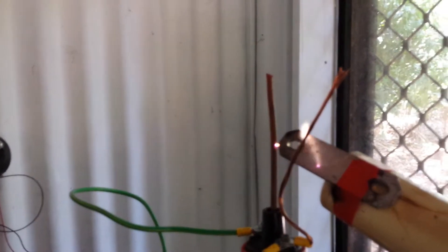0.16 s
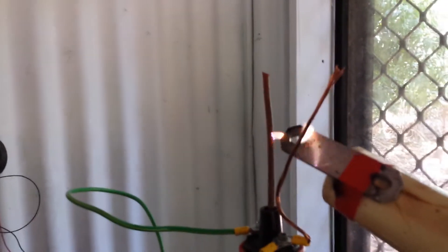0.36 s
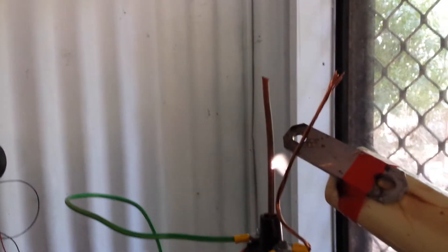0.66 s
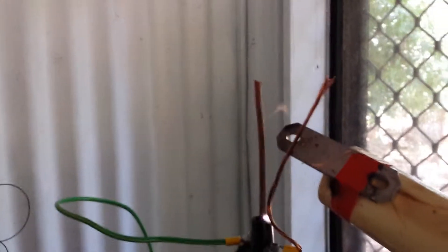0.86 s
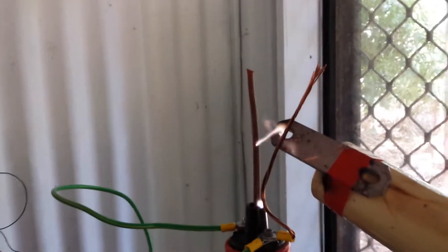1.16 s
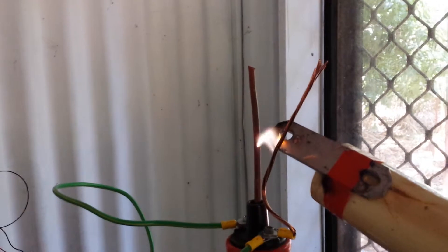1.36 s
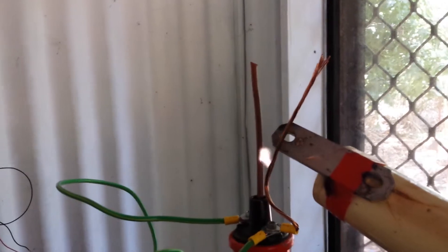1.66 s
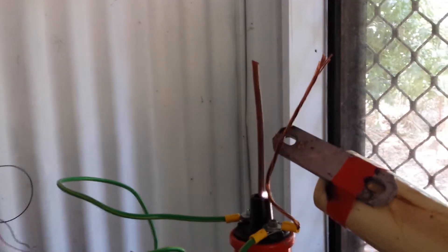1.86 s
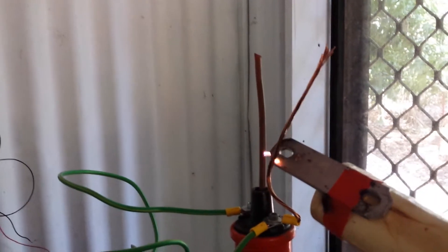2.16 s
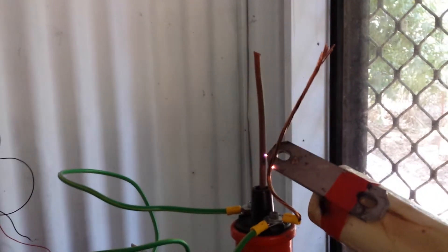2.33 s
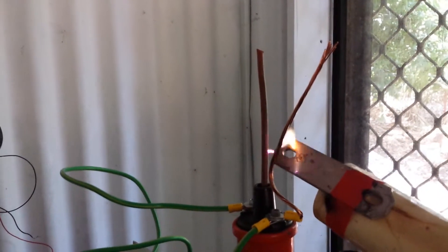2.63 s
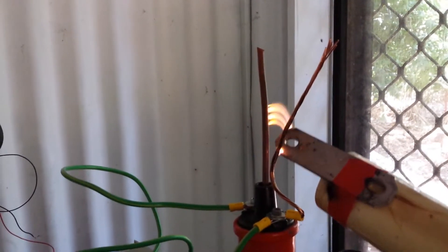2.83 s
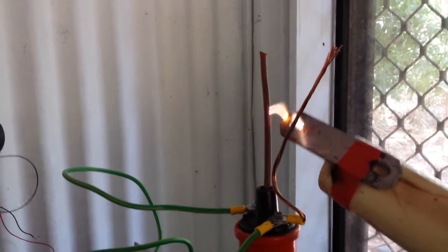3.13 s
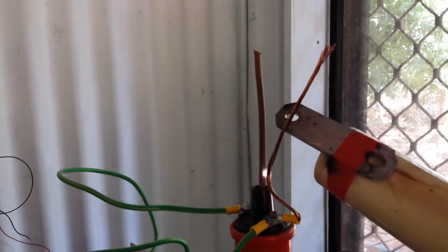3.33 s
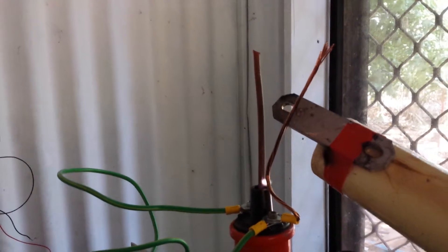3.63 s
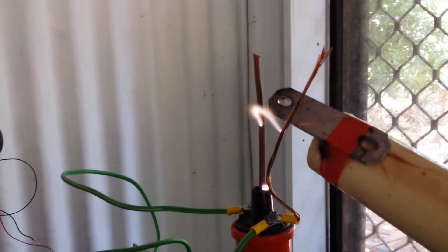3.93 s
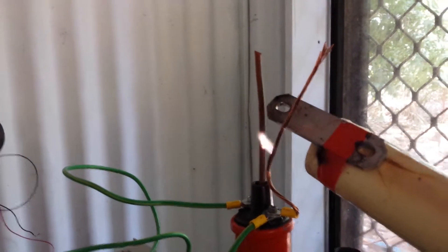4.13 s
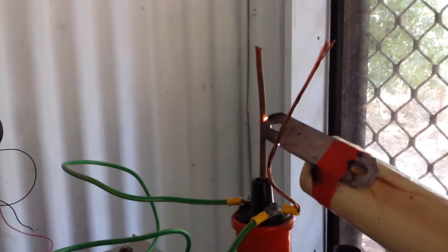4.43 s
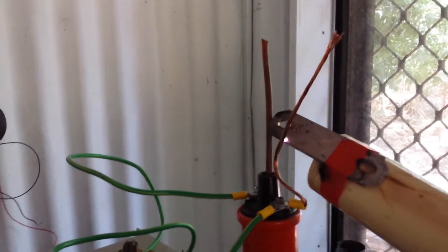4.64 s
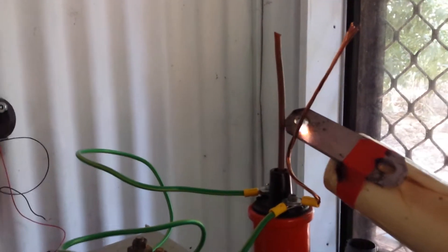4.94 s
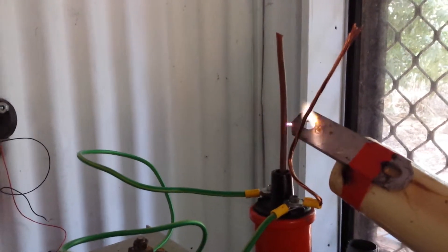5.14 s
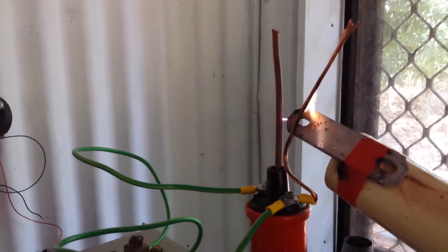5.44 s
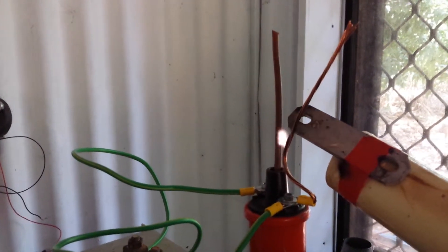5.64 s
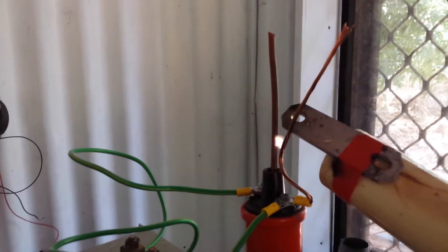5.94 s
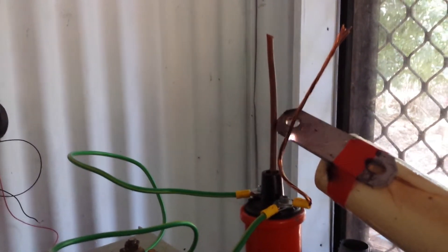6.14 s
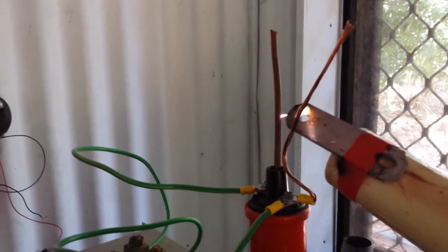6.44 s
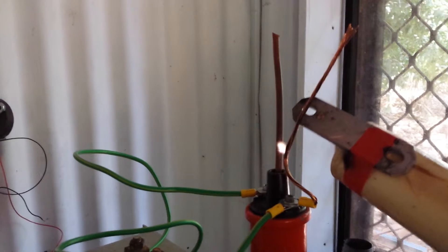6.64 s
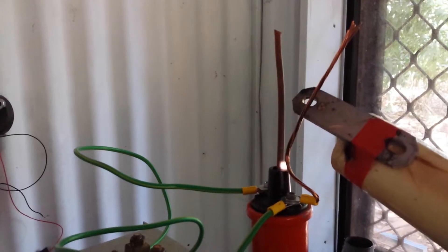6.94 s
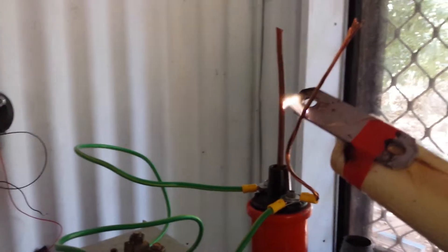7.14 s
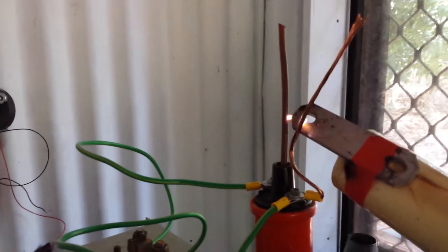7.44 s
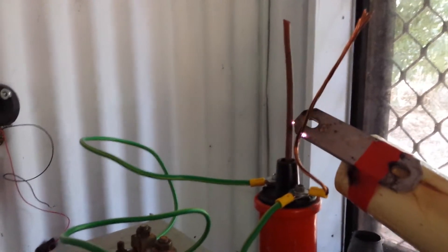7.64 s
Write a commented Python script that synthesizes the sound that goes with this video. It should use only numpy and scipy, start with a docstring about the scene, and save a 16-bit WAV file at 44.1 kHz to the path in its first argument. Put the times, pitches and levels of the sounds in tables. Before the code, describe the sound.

Close up in a small shed, an electric arc crackles continuously with a bright sizzle, dense high hiss and a thin, piercing whine. It surges irregularly several times a second, rasping and snapping as it stretches, breaks and strikes again. From about one second on, spells of fast, crisp spark ticking come and go, along with brief high squeals. A soft drone like a fan stays in the background.

```python
"""Inside a metal shed, close to the microphone, a high-voltage arc burns between wires on an ignition coil.
From the start it buzzes and fries, breaking down on every half cycle of the mains, while the coil whines
at its switching rate. Again and again a steel blade draws it out: it strikes later, the whine sags deeper
with the supply ripple, and the arc rasps, breaks and relights. From about one second on it falls back at
times to the narrow gap and ticks cleanly, most often near the end. A fan-like drone lies behind it all."""
import sys
import numpy as np
from scipy import signal
from scipy.fft import rfft, irfft, next_fast_len
from scipy.io import wavfile
from scipy.ndimage import uniform_filter1d

SR = 44100
rng = np.random.default_rng(int(sys.argv[2]) if len(sys.argv) > 2 else 0)


def unload_wav(signal):
    """Save mono or channel-first audio to the path in sys.argv[1] as 16-bit WAV at rate SR, clipped to [-1, 1]."""
    wavfile.write(
        sys.argv[1],
        SR,
        np.round(np.clip(np.atleast_2d(signal).T, -1, 1) * 32767).astype(np.int16),
    )


N = 343539
TIME = np.arange(N) / SR

# Levels in the tables are relative; the mix sets the final balance.
# Supply ripple. Each row: time in seconds, half cycles per second.
RIPPLE_RATE = [(0, 99.5), (1, 99.49), (2, 99.6), (3, 99.74), (4, 99.82), (5.3, 99.9), (7, 99.97),
               (7.8, 99.99)]
# The blade draws the arc out. Each row: break in seconds, time for the last 10 dB of growth in ms, peaks
# of whine, hiss, strikes, sizzle and plume in dB, rasp pitch in Hz, rasp level in dB.
BLADE_PULLS = [(0.17, 60, -27, -33.5, -24, -32, -31, 4270, -26),
               (0.294, 120, -9, -23, -35, -19, -26, 3840, -33),
               (0.518, 70, -14.5, -36, -22, -25, -33, 4080, -29),
               (0.619, 90, -11, -23.5, -21.5, -19, -35, 4160, -34),
               (0.943, 69.6, -16, -39.0, -53, -30, -48, 4100, -47),
               (1.38, 58.6, -32, -37.5, -38, -36, -52, 2490, -44),
               (1.438, 60, -14, -25.5, -22.5, -25, -51, 2150, -29),
               (1.658, 100, -10, -29, -23.5, -23.5, -31.5, 4190, -37),
               (1.806, 100, -14, -29.5, -22.5, -26, -37, 2570, -31),
               (1.995, 160, -9, -23.0, -25, -21.5, -26.5, 3140, -38),
               (2.346, 100, -14, -27.5, -29, -22, -26.5, 2960, -32),
               (2.723, 110, -15, -26, -25, -24, -27.5, 3780, -41),
               (2.975, 90, -24, -35.5, -26.5, -24, -37, 4200, -29),
               (3.178, 140, -9, -25.5, -25, -38, -32, 2880, -28.5),
               (3.825, 70, -8.5, -26, -22.5, -27, -35.5, 3930, -31),
               (3.999, 120, -14, -26, -26.5, -20, -33, 3050, -28),
               (4.132, 60, -10, -28.5, -26, -21.5, -34, 3040, -35),
               (4.291, 80, -11, -24.5, -26, -28, -53, 2886, -28.5),
               (4.533, 63, -18, -36.5, -30.5, -23, -49, 3010, -39),
               (4.615, 60, -9, -25.5, -29.5, -24, -50, 2985, -32),
               (4.954, 200, -21, -31.5, -28.5, -28, -49, 3900, -39),
               (5.096, 51, -9.5, -28, -25.5, -21, -45, 4200, -36),
               (5.335, 150, -9, -23.5, -26, -23, -29, 2640, -43),
               (5.617, 81, -24, -29, -23.5, -23, -27, 3110, -29),
               (5.739, 110, -12, -27, -24.5, -20.5, -35, 3130, -26),
               (5.972, 110, -13.5, -35.5, -27.5, -22.5, -30.5, 2656, -32.5),
               (6.061, 100, -17, -26.5, -23.5, -20, -51, 2677, -26),
               (6.262, 59.3, -32, -35.5, -39, -19.5, -42, 3400, -38),
               (6.616, 50, -24, -35.5, -26, -22.5, -56, 2250, -36),
               (6.766, 66, -9.5, -27.5, -24.5, -28, -56, 2830, -30),
               (6.912, 72, -9, -26, -25.5, -44, -34, 3040, -43),
               (6.996, 130, -12, -26, -28, -20.5, -32, 2810, -23),
               (7.136, 60, -31, -34, -42, -27, -36, 2596, -49),
               (7.751, 70, -34, -34, -30, -33, -42, 2040, -48)]
# The arc between pulls. Each row: time in seconds, then whine, hiss, strikes, sizzle and plume in dB.
SHORT_ARC_LEVELS = [(0.0, -16, -36.0, -33, -22.5, -38.5), (0.4, -14.5, -37.5, -33.5, -36, -37.5),
                    (0.772, -14.5, -38.5, -30, -24.5, -38.5), (1.049, -14.5, -35, -40.5, -26.5, -36),
                    (1.206, -23, -40, -44, -27.5, -47), (1.323, -15.5, -37, -39, -25, -41.5),
                    (2.126, -15, -40.5, -32, -27.5, -37.5), (2.854, -15, -37, -35, -25.5, -40),
                    (3.063, -15, -33, -27, -32, -32.5), (3.33, -20.5, -38, -48, -26.5, -49.5),
                    (3.553, -15, -35.5, -45, -26, -43), (4.59, -16.5, -45.5, -40, -29.5, -38),
                    (5.216, -14, -46, -39, -27, -39.5), (6.252, -14.5, -36.5, -35, -31, -39.5),
                    (6.506, -18, -38.5, -52, -27, -44), (7.198, -14.5, -32.5, -30, -25.5, -35),
                    (7.434, -18, -39, -47, -29.5, -43), (7.788, -14.5, -33.5, -34, -24, -38)]
# Parts of the arc. Each row: name, growth power (1 even in dB, 2 rounded), collapse in dB per second.
ARC_PARTS = [("whine", 1.7, 400), ("hiss", 1.1, 210), ("strikes", 2.7, 180), ("sizzle", 1.3, 97),
             ("plume", 0.8, 280)]
# The short arc nearly goes out. Each row: centre in seconds, half length in seconds, depth in dB.
ARC_LULLS = [(3.39, 0.0507, 1.5), (3.89, 0.0515, 3), (4.444, 0.053, 4), (4.738, 0.13, 3), (5.47, 0.057, 4),
             (5.889, 0.095, 4.5)]
# Hard restrikes. Each row: start in seconds, crack level in dB, frying level in dB.
RESTRIKES = [(0.1416, -7.0, -35), (0.302, -3, -19), (0.6361, -9, -27), (1.3168, -10, -22),
             (1.357, -12, -26), (1.3777, -3, -28), (1.4073, 0, -27), (1.4278, -11, -37),
             (1.4484, -5.0, -32), (1.4592, -5.5, -26), (1.5685, -3, -30), (1.6496, -4, -22),
             (1.7802, 0, -25), (1.8092, -4, -18.5), (2.0025, -7, -22), (2.2614, -6, -34), (2.2915, -3, -35),
             (2.3219, 1, -25), (2.3538, -6, -32), (2.7352, -13, -20.5), (3.1144, -2, -22),
             (3.1748, -5, -22), (3.6548, -13, -36), (3.7149, -10, -28), (3.7553, -3, -31),
             (3.7855, -1, -32), (3.8573, -17, -19.5), (3.8956, -9, -21), (3.9458, -2.5, -34),
             (3.9558, -2, -36), (3.9955, -7, -25), (4.0155, -9, -19.5), (4.0458, -4, -32), (4.106, -6, -33),
             (4.1357, -3, -25), (4.1576, -6, -28), (4.2061, -4.5, -33), (4.308, -7.0, -25),
             (4.9071, -7, -33), (4.9179, -7, -23), (5.1289, -14, -33), (5.2376, -3.5, -32),
             (5.3473, -4.0, -18), (5.7076, -6, -20.5), (5.7503, -8, -28), (5.9382, -5, -31),
             (6.049, -4, -22), (6.07, -11, -28), (6.2683, -7, -31), (6.3778, -8, -32), (6.6285, -8, -33),
             (6.7783, -3.0, -21), (6.7883, -6, -32), (6.869, -1, -33), (7.0205, -7, -22), (7.0789, -3, -29),
             (7.0889, -2, -32), (7.1188, -6, -25), (7.1788, -4, -33), (7.1888, -5.5, -35),
             (7.2288, -3, -33), (7.3584, -15, -27), (7.7584, -8, -35)]
# Ticking at the narrow gap. Each row: start in seconds, end in seconds, level in dB.
NARROW_GAP_RUNS = [(0.98, 1.384, -33.5), (2.365, 2.444, -35), (2.801, 2.89, -49), (3.33, 3.459, -33),
                   (3.458, 3.763, -29.5), (3.942, 4.15, -39), (4.888, 5.19, -31), (6.248, 6.31, -37),
                   (6.418, 6.648, -33.5), (6.696, 6.874, -31), (7.065, 7.783, -31.5)]
# Spectra of the discharges and the background rush. Each row: frequency in Hz, level in dB.
SPARK_SPECTRUM = [(100, -70), (250, -25), (520, -21.5), (800, -9), (1010, -13), (1150, -10.5), (1450, -4.5),
                  (2200, 5), (3000, -2), (4200, 2), (6500, 1), (8500, -3.5), (11500, -28.5)]
SPUTTER_SPECTRUM = [(100, -33), (170, -24), (300, 8), (420, 0.5), (520, -1.5), (700, 3), (880, 5.5),
                    (1010, -13), (1100, 5.5), (1500, 7), (2400, 11.5), (5000, 7), (9000, -2.5),
                    (13000, -20)]
SIZZLE_SPECTRUM = [(1500, -34), (3500, -1.5), (4900, 1), (5500, 6.5), (6500, 9), (7300, 3.5), (8200, 0),
                   (9500, -4.5), (12500, -9.5)]
HISS_SPECTRUM = [(5000, -53), (8000, 4), (10000, 9), (12000, 9.5), (14500, 17.5)]
TICK_SPECTRUM = [(300, -38), (1200, -27), (2250, -7.5), (2750, -8.5), (3900, -6), (4500, -8), (5500, 5.5),
                 (6300, 9.5), (7300, 5), (8400, -1.5), (12000, -10.5)]
RUSH_SPECTRUM = [(25, -72), (110, -52), (160, -13), (205, 6.5), (290, 5.5), (390, 12), (450, -10.5),
                 (540, -1), (680, -2), (880, 1), (1010, -38.5), (1090, 12.5), (1200, -23), (1330, -13),
                 (1480, 5), (1650, -1.5), (3000, -14.5)]
# The switching rate sags more under a long, hissing arc. Each row: hiss level in dB, sag in Hz.
SAG_BY_HISS = [(-39, 850), (-34, 1350), (-30, 3200), (-26, 4600)]
# The half-rate squeal catches. Each row: centre in seconds, half length in seconds, level in dB.
SQUEAL_CATCHES = [(0.237, 0.049, -24), (0.556, 0.022, -19.5), (1.077, 0.043, -29), (1.375, 0.016, -18.5),
                  (3.06, 0.057, -20.5), (3.216, 0.1, -23.5), (3.676, 0.011, -22), (3.748, 0.011, -15.5),
                  (3.79, 0.021, -25), (4.11, 0.03, -26), (4.205, 0.029, -35), (4.884, 0.032, -18.5),
                  (5.241, 0.047, -22.5), (6.01, 0.017, -22), (6.403, 0.028, -21), (6.693, 0.017, -19.5),
                  (7.206, 0.027, -20.5), (7.716, 0.045, -22)]
# Echoes off surfaces beside the gap, then off bench and wall. Each row: delay in seconds, relative gain.
GAP_ECHOES = [(.00025, .2), (.00155, .42), (.00265, .33), (.0037, .14)]
SHED_ECHOES = [(.0058, .16), (.00825, .18)]
# Narrow low-middle bands that fade in and out.
# Each row: low and high edge in Hz, level and swing in dB, share of the slow trend.
FADING_BANDS = [(433, 600, -4, 22, 0.83), (590, 740, 1.5, 8.5, 0.015), (729, 840, -1.5, 18, 0.3),
                (832, 940, 1, 13, 0.35), (930, 1060, -3.5, 16, .6), (1053, 1160, 0, 11.5, 0),
                (1165, 1260, -1, 13, 0), (1253, 1420, -4, 15, 0.2), (1400, 1560, 1, 5.5, 0),
                (1560, 1680, -1.5, 15, 0.17)]
# Slow trend of those bands. Each row: time in seconds, level in dB.
BAND_TREND = [(0, 5.5), (1.2, 1.5), (1.7, -1), (2.3, 5), (3.0, -4), (3.5, 6), (3.85, -12), (4.35, -20),
              (4.6, 3), (5.2, -6.5), (6.3, -3), (6.7, -22), (7.2, -2), (7.79, 1.5)]
# Tones of the drone. Each row: pitch in Hz, level in dB, waver in Hz.
DRONE_TONES = [(220.2, -54, 0.71), (292, -58.5, 5.92), (342, -53.5, 5.02), (394.5, -52.5, 4.85),
               (659.3, -53, 2), (671, -54.5, 3.4), (888, -61, 5.2)]
# Brief, faint low blips at about 100 Hz. Each row: centre in seconds, level in dB.
LOW_BLIPS = [(.17, -42), (.25, -41), (.6, -44), (.925, -51), (1.81, -51), (1.89, -42), (1.981, -40),
             (2.24, -49), (2.32, -41), (2.66, -44), (3.16, -44), (4.8, -49), (4.89, -51), (5.48, -47),
             (5.635, -44), (6.02, -47.5), (6.5, -52), (6.894, -46), (7.001, -45)]
# The background rush. Each row: time in seconds, level in dB.
RUSH_LEVELS = [(0, -42.5), (3.3, -41.5), (4.1, -48.5), (5.2, -42.5), (7.79, -45.5)]


def strikes(cycles, stretch, short_gap_s=.00045, long_gap_s=.0026, lesser_db=-7):
    """Two sparks a half cycle; a longer gap needs more voltage, so the second is later and wins more."""
    starts, polarity = ordinary_starts(cycles)
    drawn = stretch[starts]
    prompt_s = .00003 * drift(4)[starts]
    late_s = (short_gap_s + (long_gap_s - short_gap_s) * drawn ** 2) * (1 + .1 * drift(20)[starts])
    late_wins = rng.random(len(starts)) < .35 + .5 * drawn
    sizes = spark_sizes(polarity, uneven_db=3.5, weak_half_db=-2)
    clicks = np.zeros(N)
    for lag_s, lesser in ((prompt_s, late_wins), (late_s, ~late_wins)):
        clicks[np.clip(starts + (lag_s * SR).astype(int), 0, N - 1)] += sizes * from_db(lesser_db * lesser)
    return steady(colour(clicks, SPARK_SPECTRUM), span_s=.09)


def restrikes():
    """A hard restrike is one sharp crack with a short spurt of frying behind it."""
    cracks, spurts = np.zeros((2, N))
    for s, crack_db, fry_db in RESTRIKES:
        cracks[int(s * SR)], spurts[int(s * SR)] = from_db(crack_db), from_db(fry_db)
    return from_db(8) * colour(cracks, SPARK_SPECTRUM) + from_db(5) * frying_after(spurts, t60_s=.074)


def sputter(cycles):
    """Stray filaments crackle through the plume, most strongly soon after a strike."""
    filaments = grains(3000, spread_db=1.5) * from_db(-8 * (cycles % 1))
    return steady(colour(filaments, SPUTTER_SPECTRUM))


def rasps(cycles, lead_s=.005, half_s=.026, rise_hz=120, jitter_hz=250):
    """Streamers refire a few thousand times a second, unevenly, and quicken as the arc is about to break."""
    out = np.zeros(N)
    ragged = rms_one(uniform_filter1d(rng.standard_normal(N), size=20))
    for s, *_, hz, db in BLADE_PULLS:
        near = np.abs(TIME - s + lead_s) < 3 * half_s
        along = (TIME[near] - s + lead_s) / half_s
        note = tone(hz + rise_hz * along + jitter_hz * ragged[near])
        out[near] += from_db(db) * np.exp(-along ** 2) * note
    return np.sqrt(2) * out * from_db(2 - 5 * (cycles % 1) + 2 * drift(500))


def sizzle(cycles, fade_db=-6):
    """The arc roots fry on the copper in uneven spurts that fade through each half cycle."""
    spurts = from_db(fade_db * (cycles % 1) + drift(300))
    return steady(colour(grains(14000, spread_db=5.5) * spurts, SIZZLE_SPECTRUM))


def hiss():
    """The burning arc hisses in the high treble."""
    return rms_one(colour(rng.standard_normal(N), HISS_SPECTRUM))


def ticks(cycles):
    """The narrow gap fires one bright, clean spark on the half cycle, with a trace of frying."""
    starts, polarity = ordinary_starts(cycles)
    clicks = np.zeros(N)
    clicks[starts] = spark_sizes(polarity, uneven_db=3, weak_half_db=-3)
    ticking = colour(clicks, TICK_SPECTRUM) + from_db(-24) * frying_after(clicks, t60_s=.017)
    runs = sum(from_db(db) * ((TIME > start) & (TIME < end)) for start, end, db in NARROW_GAP_RUNS)
    return rms_one(ticking) * uniform_filter1d(runs, size=441)


def ordinary_starts(cycles):
    """First samples of the half cycles that no hard restrike takes, and the polarity of each."""
    starts = np.flatnonzero(np.diff(np.floor(cycles)) > 0) + 1
    taken = np.round(np.interp([row[0] for row in RESTRIKES], TIME, cycles))
    starts = starts[~np.isin(np.round(cycles[starts]), taken)]
    return starts, np.round(cycles[starts]) % 2


def spark_sizes(polarity, uneven_db, weak_half_db):
    """Sparks vary by chance, and one polarity fires harder."""
    chance = np.clip(rng.standard_normal(len(polarity)), -2.5, 1.2)
    return from_db(uneven_db * chance + weak_half_db * polarity)


def grains(per_s, spread_db):
    """Tiny discharges at random moments, a few much larger than the rest."""
    sizes = from_db(spread_db * np.minimum(rng.exponential(1, N), 4)) * rng.choice([-1, 1], N)
    return sizes * (rng.random(N) < per_s / SR)


def frying_after(clicks, t60_s):
    """A short spurt of frying behind each click."""
    envelope = signal.fftconvolve(clicks, from_db(-60 * TIME[:SR // 10] / t60_s))[:N]
    return colour(envelope * rng.standard_normal(N), SIZZLE_SPECTRUM)


def arc_level(part, lull_db, wander_db, late_s=0, rise_ms=None):
    """Relative dB of one part of the arc: the short arc, plus a growth and quick collapse for each pull."""
    k = [row[0] for row in ARC_PARTS].index(part)
    _, curve, die_db_per_s = ARC_PARTS[k]
    t = TIME[::100]
    pull_power = 0
    for s, growth_ms, *peaks_db in BLADE_PULLS:
        after = t - s - late_s
        to_grow = 1000 * np.maximum(-after, 0) / (rise_ms or growth_ms)
        pull_power += from_db(peaks_db[k] - 10 * to_grow ** curve - die_db_per_s * np.maximum(after, 0)) ** 2
    short_power = from_db(in_time(SHORT_ARC_LEVELS)[k] - lull_db) ** 2
    return 10 * np.log10(short_power + np.interp(TIME, t, pull_power)) + wander_db * drift(35)


def whine(cycles, sag_hz, stretch, top_hz=14390):
    """The coil's switching rate arches each half cycle, loudest at the crest; a short arc makes it ragged."""
    dip = ripple_dip(cycles, stretch)
    ragged = 1.3 - stretch
    hz = top_hz + 130 * (.5 - stretch) - sag_hz * dip + 480 * ragged * drift(2500)
    level_db = -7 * np.sqrt(np.maximum(top_hz - hz, 0) / 2000) + .5 * ragged * drift(600)
    trough_db = -(9.4 + 9 * stretch) * dip
    return steady(top_cut(tone(hz) * from_db(level_db + trough_db)), span_s=.046)


def squeal(cycles, sag_hz, stretch, top_hz=7200):
    """When the arc takes only every second switching pulse, a ragged tone sounds an octave lower."""
    dip = ripple_dip(cycles, stretch)
    hz = top_hz - .25 * sag_hz * dip + 220 * (1.2 - .597 * stretch) * drift(3000)
    return steady(tone(hz) * from_db(-5 * dip + 1.5 * drift(300)))


def ripple_dip(cycles, stretch):
    """0 at the supply's crest, 1 in the trough before the next strike; a long arc keeps better time."""
    crest = .4 + (.1 - .08 * stretch) * drift(60)
    return np.abs(2 * ((cycles - crest + .5) % 1 - .5)) ** 2.4


def close_ring(x, wander_s, strength):
    """Hard surfaces beside the gap give a hollow ring; the delays shift as the arc moves about."""
    return x + sum(strength * gain * np.interp(TIME - delay - wander_s * drift(9), TIME, x)
                   for delay, gain in GAP_ECHOES)


def shed(x, t60_s=.2, wet_db=-10.5):
    """The microphone gets direct sound, bench and wall echoes, and a tail that shifts as the arc wanders."""
    t = TIME[:SR // 2]
    out, wander = x.copy(), 2 * np.pi * TIME + drift(3)
    for weight in (np.cos(wander), np.sin(wander)):
        tail = rng.standard_normal(len(t)) * from_db(-60 * t / t60_s) * (t > .002)
        out += from_db(wet_db) * signal.fftconvolve(x * weight, tail / np.linalg.norm(tail))[:N]
    for delay, gain in SHED_ECHOES:
        lag = int(delay * SR)
        out[lag:] += gain * x[:-lag]
    return from_db(-1) * out


def fade_bands(x):
    """Narrow low-middle bands fade in and out, giving a hollow, watery sound."""
    spectrum = rfft(x, next_fast_len(N))
    hz = np.linspace(0, SR / 2, len(spectrum))
    out, trend_db = x.copy(), in_time(BAND_TREND)[0]
    for low, high, db, swing_db, share in FADING_BANDS:
        band = irfft(spectrum * ((hz >= low) & (hz < high)), next_fast_len(N))[:N]
        level_db = db + share * trend_db + swing_db * np.minimum(drift(19), .3)
        out += (from_db(level_db) - 1) * band
    return out


def drone(cycles):
    """In the background, a few wavering tones and brief, faint low blips at about 100 Hz."""
    tones = sum(from_db(db + 2 * drift(17)) * tone(hz + waver * drift(30)) for hz, db, waver in DRONE_TONES)
    blips = bumps([(s, .015, from_db(db)) for s, db in LOW_BLIPS])
    return np.sqrt(2) * (tones + blips * np.sin(2 * np.pi * cycles))


def rush():
    """Soft, fan-like rushing behind the arc."""
    gain = from_db(in_time(RUSH_LEVELS)[0] + 2 * drift(20))
    return gain * rms_one(colour(rng.standard_normal(N), RUSH_SPECTRUM))


def from_db(db):
    """Decibels to gain."""
    return 10 ** (np.asarray(db) / 20)


def rms_one(x):
    """Scale to unit rms."""
    return x / np.sqrt(np.mean(x ** 2) + 1e-20)


def steady(x, span_s=.085):
    """Unit rms over every short span; faster changes stay."""
    return x / np.sqrt(np.abs(uniform_filter1d(x ** 2, int(span_s * SR) + 1)) + 1e-12)


def tone(hz):
    """Sine that follows a moving pitch."""
    return np.sin(2 * np.pi * np.cumsum(hz) / SR)


def in_time(rows):
    """Columns of a curve at every sample."""
    s, *columns = np.transpose(rows)
    return [np.interp(TIME, s, c) for c in columns]


def drift(per_s):
    """Random wander of unit rms, with so many turns a second."""
    turns = rng.standard_normal(int(8 * per_s) + 2)
    return rms_one(np.interp(TIME * per_s, np.arange(len(turns)), turns))


def bumps(rows):
    """Sum of bell curves. Each row: centre in seconds, half length in seconds, height."""
    return sum(height * np.exp(-np.minimum(((TIME - s) / half_s) ** 2, 50)) for s, half_s, height in rows)


def colour(x, spectrum, size=8192):
    """Causal (minimum-phase) filter with the given spectrum."""
    hz, db = np.transpose(spectrum)
    grid = np.maximum(np.arange(size // 2 + 1) * SR / size, 1)
    cepstrum = irfft(np.log(from_db(np.interp(np.log(grid), np.log(hz), db))))
    cepstrum[1:size // 2] *= 2
    cepstrum[size // 2 + 1:] = 0
    return signal.fftconvolve(x, irfft(np.exp(rfft(cepstrum))))[:N]


def top_cut(x, cutoff_hz=14540):
    """Steep low-pass that delays all frequencies alike."""
    return signal.fftconvolve(x, signal.firwin(1001, cutoff_hz, fs=SR), "same")


def scene():
    """The arc up close, the drone behind; mains ripple times the arc and its stretch sets how wild it gets."""
    cycles = np.cumsum(in_time(RIPPLE_RATE)[0]) / SR - .0003 * RIPPLE_RATE[0][1]   # counts half cycles
    lull_db = bumps(ARC_LULLS)
    whine_db = arc_level("whine", lull_db, wander_db=1.35)
    hiss_db = arc_level("hiss", lull_db, wander_db=.68)
    strike_db = arc_level("strikes", lull_db, wander_db=.5)
    sizzle_db = arc_level("sizzle", lull_db, wander_db=1.5, late_s=.019, rise_ms=29)   # flares on relighting
    plume_db = arc_level("plume", lull_db, wander_db=1.5)
    catches = bumps([(s, half_s, from_db(db)) for s, half_s, db in SQUEAL_CATCHES])
    squeal_gain = from_db(-1.5) * np.hypot(from_db(-30.5 - lull_db + 2.7 * drift(25)), catches)
    hiss_steps, sag_steps = np.transpose(SAG_BY_HISS)
    sag_hz = np.interp(hiss_db, hiss_steps, sag_steps)
    stretch = (sag_hz - sag_steps[0]) / (sag_steps[-1] - sag_steps[0])   # 0 short arc, 1 fully drawn

    sparks = from_db(strike_db - .7) * strikes(cycles, stretch)
    sparks += from_db(plume_db + 4) * sputter(cycles) + rasps(cycles)
    ceiling = .6   # the stored charge bounds the ordinary sparks
    sparks = ceiling * np.tanh(sparks / ceiling) + restrikes()
    # cut the low rumble left by rounding off the spark peaks
    sparks = signal.sosfilt(signal.butter(4, 190, "high", fs=SR, output="sos"), sparks)
    frying = from_db(sizzle_db - 2) * sizzle(cycles) + from_db(hiss_db + 10) * hiss()
    coil = from_db(whine_db - 3) * whine(cycles, sag_hz, stretch)
    coil += squeal_gain * squeal(cycles, sag_hz, stretch)
    sparks = close_ring(sparks, wander_s=.00009, strength=.68)
    sparks += from_db(3.5) * close_ring(ticks(cycles), wander_s=.00002, strength=.62)
    return (fade_bands(shed(sparks + frying + coil) + rush()) + drone(cycles))[None]


def record(dry):
    """One microphone, its top cut just above the whine."""
    return top_cut(dry[0])[None]


dry = scene()
out = record(dry)
unload_wav(out)
```